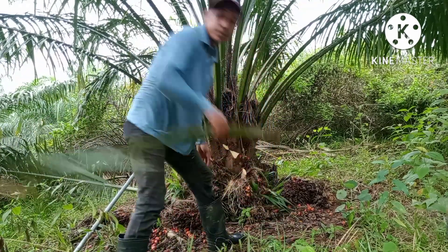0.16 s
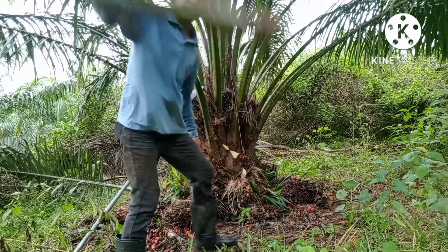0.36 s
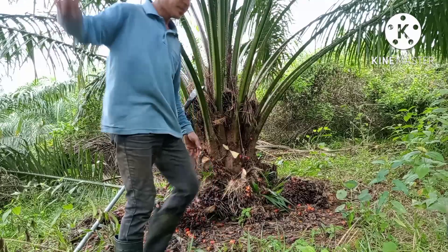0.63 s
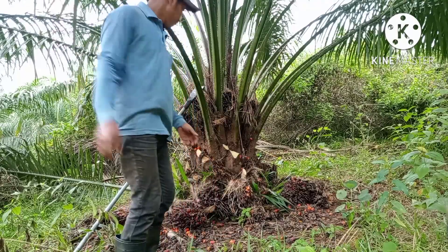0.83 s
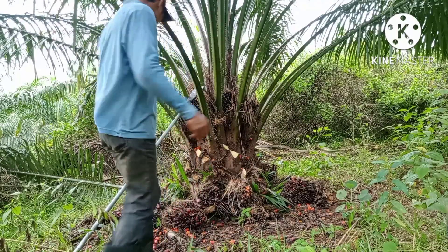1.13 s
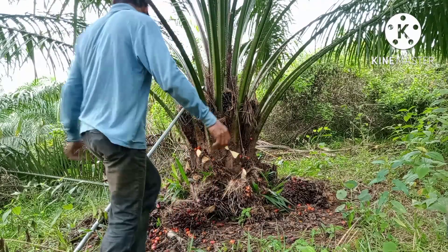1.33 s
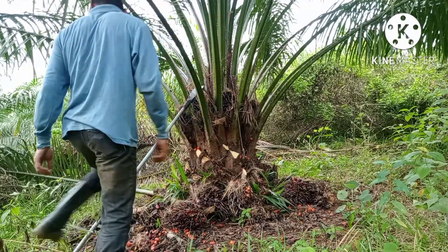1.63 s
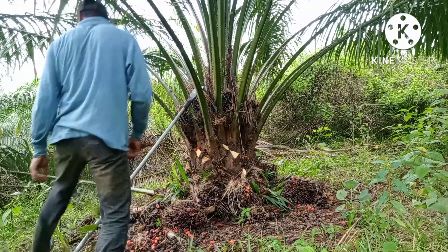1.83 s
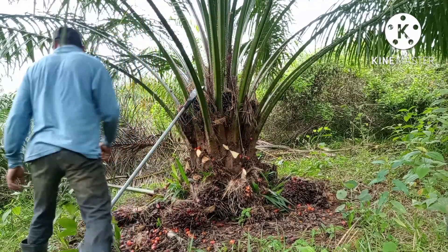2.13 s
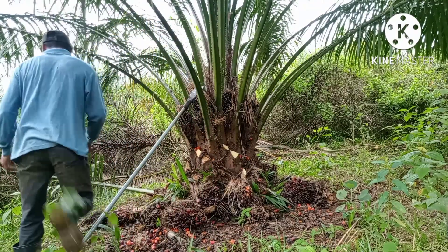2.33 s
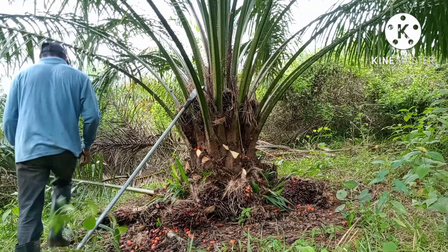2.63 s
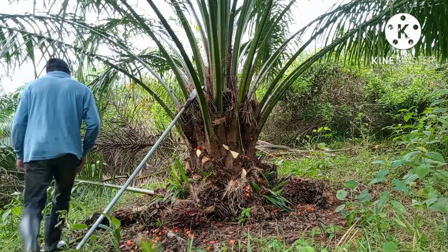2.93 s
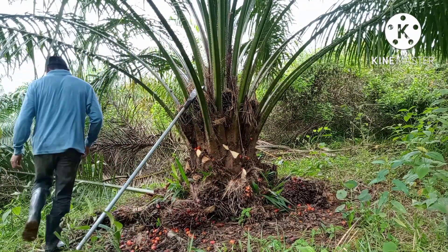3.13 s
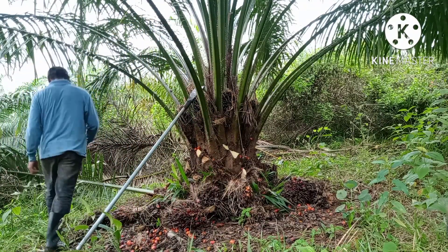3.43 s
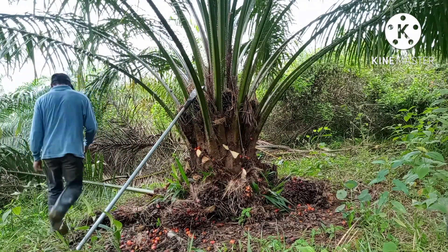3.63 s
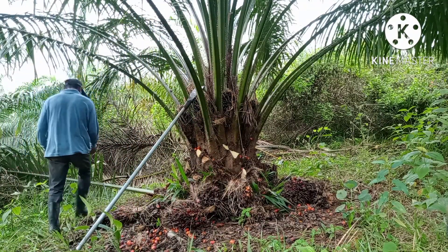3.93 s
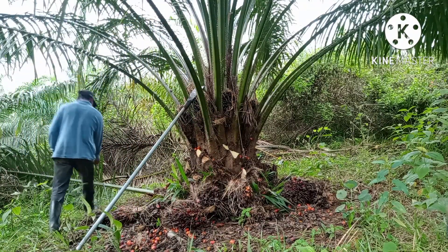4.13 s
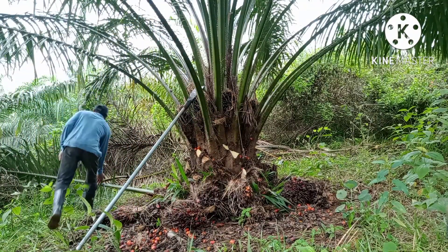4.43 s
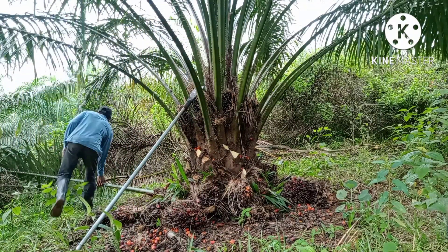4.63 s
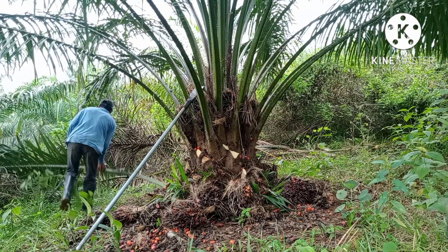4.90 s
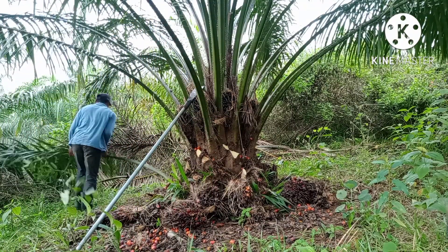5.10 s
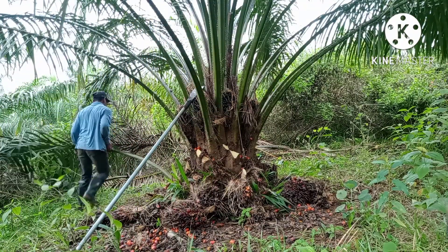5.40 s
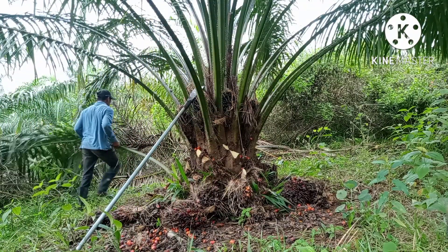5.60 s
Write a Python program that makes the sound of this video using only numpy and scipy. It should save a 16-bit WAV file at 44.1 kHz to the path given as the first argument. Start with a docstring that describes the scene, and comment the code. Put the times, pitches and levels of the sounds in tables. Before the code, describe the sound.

Boots shift, a thrown palm frond rustles and crashes onto a heap, then soft footsteps move off through undergrowth amid trilling insects and birds.

```python
"""Insects trill and buzz all round a plantation and distant birds call, over a faint wash of air.
Boots shift on the spot; a thrown palm frond brushes through leaves, crashes onto a heap of fronds and settles.
The walker goes off through the undergrowth and pushes into the leaves.
Leaves and soil are coloured random grains, blows are filtered clicks and ringing sines,
insects are pulsed narrow noise, and birds are bent tones or short noise bands."""
import sys
import numpy as np
from scipy import signal
from scipy.io import wavfile
from scipy.ndimage import uniform_filter1d

SR = 44100
rng = np.random.default_rng(int(sys.argv[2]) if len(sys.argv) > 2 else 0)


def pcm_store(signal):
    """Save signal as 16-bit PCM."""
    levels = np.round(np.clip(np.atleast_2d(signal), -1, 1) * 32767)
    wavfile.write(sys.argv[1], SR, levels.astype(np.int16).T)


N = 253794
T = np.arange(N) / SR


def amp(db):
    """Decibels to gain."""
    return 10 ** (np.asarray(db) / 20)


def evened(x):
    """Scales to rms 1."""
    return x / np.sqrt(np.mean(x ** 2) + 1e-20)


def add(mix, start_s, sound):
    """Mixes a sound in at start_s, or at 0 if that is negative."""
    part = mix[max(round(start_s * SR), 0):][:len(sound)]
    part += sound[:len(part)]


def drift(per_s):
    """Random values joined by straight lines; rms 1."""
    return evened(np.interp(T * per_s, np.arange(N), rng.standard_normal(N)))


def held(start_s, end_s, attack_s, release_s):
    """Rises exponentially from the start, holds until the end and dies away."""
    rise = 1 - np.exp(-np.maximum(T - start_s, 0) / attack_s)
    return rise * np.exp(-np.maximum(T - end_s, 0) / release_s)


def dying(start_s, decay_s):
    """Jumps to 1 and dies away exponentially."""
    return (T >= start_s) * np.exp(-abs(T - start_s) / decay_s)


def click(spectrum, size=4096):
    """The causal, minimum-phase click of energy 1 with this spectrum."""
    hz, db = np.transpose(spectrum)
    bin_hz = abs(np.fft.fftfreq(size, 1 / SR))
    bin_db = np.interp(np.log(bin_hz + 1), np.log(hz), db)
    log_gain = np.log(amp(bin_db))
    taps = np.fft.ifft(np.exp(np.conj(signal.hilbert(log_gain)))).real[:size // 2]
    return taps / np.linalg.norm(taps)


def coloured(x, spectrum):
    """Gives every impulse in x the spectrum."""
    return signal.oaconvolve(x, click(spectrum))[:N]


def grains(per_s, spread_db):
    """Random tiny contacts, sizes spread exponentially in dB; rms 1."""
    size = amp(spread_db * np.minimum(rng.exponential(1, N), 4))
    hits = rng.random(N) < per_s / SR
    return evened(size * rng.choice([-1, 1], N) * hits)


def band(hz, pole_width_hz):
    """Noise through a double-pole resonance whose pitch may move; rms 1."""
    r = np.exp(-np.pi * pole_width_hz / SR)
    noise = rng.standard_normal(N) + 1j * rng.standard_normal(N)
    slow = signal.lfilter([1], [1, -2 * r, r * r], noise)
    carrier = np.exp(2j * np.pi * np.cumsum(hz * np.ones(N)) / SR)
    return evened((slow * carrier).real)


# Spectrum of the outdoor air. Each row: frequency in Hz, relative density in dB.
AIR_SPECTRUM = [(25, -26.5), (45, -14), (70, 2), (140, 2), (300, -6.5), (700, -10.5), (1400, -17),
                (2200, -13), (3000, -10.5), (3950, -22), (5400, -21), (6600, -26), (8000, -46.5),
                (15500, -37.5)]


def air():
    """Faint outdoor wash: coloured noise with a slow random swell."""
    level_db = -66.5 + 0.94 * drift(per_s=2.9)
    return amp(level_db) * coloured(rng.standard_normal(N), AIR_SPECTRUM)


# Trill, high buzz, two faint shimmers. Each row: pitch in Hz, pole width in Hz, level before pulsing in dB.
STEADY_INSECTS = [(4538, 300, -64), (9985, 810, -66.5), (5300, 410, -82), (6300, 320, -93)]
# A farther cricket's bouts. Each row: start in s, end in s, level before throbbing in dB.
CRICKET_BOUTS = [(0, .45, -67.5), (3.257, 3.7, -68.5), (3.8, 5.75, -71)]
# Thin high chirps. Each entry: nominal start in s.
CHIRP_STARTS_S = [.08, .46, 3.54, 3.98, 4.37, 4.82]
SYLLABLES_PER_S, BUZZES_PER_S = 21.5, 102.6
BOUT_ATTACK_S, BOUT_RELEASE_S, CRICKET_REST_DB = 0.013, 0.28, -78.5


def insects():
    """Wing strokes pulse narrow resonances; trill and cricket sag in pitch through each syllable."""
    syllable = (SYLLABLES_PER_S * T + 0.059 * drift(per_s=6)) % 1
    sag = .5 - syllable
    throb = 1 + .24 * np.sin(2 * np.pi * syllable)
    strokes = 1 + .45 * np.sin(6 * np.pi * syllable)  # three per syllable
    rattle = 1 + .25 * np.sin(2 * np.pi * BUZZES_PER_S * T)
    glides_hz = [130 * sag, 0, 0, 0]
    trill, buzz, *shimmers = [amp(db) * band(hz + glide_hz, width_hz)
                              for (hz, width_hz, db), glide_hz in zip(STEADY_INSECTS, glides_hz)]
    bouts = [amp(db) * held(start_s, end_s, BOUT_ATTACK_S, BOUT_RELEASE_S)
             for start_s, end_s, db in CRICKET_BOUTS]
    singing = np.maximum(np.max(bouts, axis=0), amp(CRICKET_REST_DB))
    cricket = band(3400 + 90 * sag, pole_width_hz=330) * singing
    chirping = sum(np.exp(-((T - s - .06) / .055) ** 4) for s in CHIRP_STARTS_S)  # flat-topped
    chirps = amp(-83.5) * chirping * band(hz=7220, pole_width_hz=110)
    return (trill * strokes + cricket) * throb + buzz * rattle + sum(shimmers) + chirps


NOTE_FADE_S = .025  # both ends together


def whistle(length_s, start_hz, middle_hz, end_hz, db, haste=1):
    """A nearly pure, unsteady note along one bend of pitch; haste under 1 hurries its start."""
    along = np.linspace(0, 1, round(length_s * SR))
    bend = np.polyfit([0, .5, 1], [start_hz, middle_hz, end_hz], 2)
    hz = np.polyval(bend, along ** haste)
    waver = 1 + 0.07 * uniform_filter1d(rng.standard_normal(N), size=200)[:len(along)]
    phase = 2 * np.pi * np.cumsum(hz * waver) / SR
    fades = signal.windows.tukey(len(along), NOTE_FADE_S / length_s)
    return np.sqrt(2) * amp(db) * np.sin(phase) * fades


# Each row: start in s, length in s, start pitch in Hz, middle pitch in Hz, end pitch in Hz, relative level in dB.
BIRD_WHISTLES = [(0, .16, 2940, 2817, 2790, -74.5), (0.073, 0.037, 3900, 3850, 3640, -72),
                 (0.108, .11, 3670, 3705, 3570, -65), (.17, 0.049, 2330, 1920, 1500, -74),
                 (2.46, 0.16, 2850, 2810, 2800, -68), (2.615, .1, 2775, 2795, 2860, -64),
                 (2.706, 0.033, 2865, 2900, 2900, -52.5), (2.739, .08, 2925, 2915, 2880, -74),
                 (3.053, .095, 7700, 4900, 3560, -72), (3.86, 0.05, 2080, 1730, 1440, -71.5),
                 (3.968, .095, 1780, 1750, 1385, -71), (4.09, .055, 1480, 1860, 2110, -73.5),
                 (4.662, 0.33, 3725, 3924, 3540, -68.5), (4.89, .08, 2660, 2725, 2726, -68),
                 (5.247, 0.066, 3090, 2950, 2940, -59.5), (5.39, 0.13, 3700, 4050, 4480, -67)]
# Harsh chatter. Each row: centre in s, pitch in Hz, relative level in dB.
BIRD_CHATTER = [(.5, 2100, -89), (4.53, 2160, -69.5), (4.63, 2106, -65), (4.715, 2125, -64.5),
                (5.36, 3030, -56), (5.42, 2880, -54.5)]
# Two repeating birds. Each entry: start in s.
HOOT_STARTS_S = [1.96, 2.208, 2.496, 2.707, 2.935, 3.165, 3.396, 3.65, 3.894, 4.135, 4.395]
PIP_STARTS_S = [0.209, .5, 2.554, 3.22, 3.545, 3.87, 4.191, 4.52]
# Their notes before variation and sag: length in s, start, middle and end pitch in Hz, relative level in dB.
HOOT_NOTE = (.15, 880, 1255, 1085, -78)
PIP_NOTE = (0.05, 1491, 1482, 1467.5, -77)
HOOT_HASTE, HOOT_SAG_PER_S = .62, .015  # the sag is a share of the pitch


def birds():
    """Scattered whistles, noise-band chatter, and two birds that repeat an arched hoot and a short pip."""
    out = np.zeros(N)
    for start_s, *note in BIRD_WHISTLES:
        add(out, start_s, whistle(*note))
    series = [(HOOT_STARTS_S, HOOT_NOTE, HOOT_HASTE, HOOT_SAG_PER_S), (PIP_STARTS_S, PIP_NOTE, 1, 0)]
    for starts_s, (length_s, *bend_hz, db), haste, sag_per_s in series:
        for start_s in starts_s:
            vary_length, vary_pitch, vary_level = rng.standard_normal(3)
            sag = sag_per_s * (start_s - starts_s[0])
            hz = np.array(bend_hz) * (1 + .008 * vary_pitch - sag)
            varied_s = length_s * np.exp(0.068 * vary_length)
            add(out, start_s, whistle(varied_s, *hz, db + 0.37 * vary_level, haste))
    for centre_s, hz, db in BIRD_CHATTER:
        out += amp(db) * band(hz, pole_width_hz=740) * np.exp(-((T - centre_s) / 0.02) ** 2)
    return out


# Spectra of leaf crackle and leaf swish. Each row: frequency in Hz, relative density in dB.
CRACKLE_SPECTRUM = [(150, -29), (1200, -16.5), (2600, 1), (4000, 1.5), (5200, -9), (7000, -10), (8500, -5),
                    (9600, 4.5), (11500, -9), (15500, -14)]
SWISH_SPECTRUM = [(50, -24.5), (130, -2.5), (450, -0.5), (800, -2), (1300, -5.5), (2400, -1), (3200, 0),
                  (4100, -8), (5200, -18.5), (9000, -33.5)]
# Leaves kept in motion: shifting on the spot after the throw, the frond sliding through the crowns,
# settling on the heap, grass round the walker's legs (two rows), pushing into the leaves.
# Each row: start in s, end in s, relative crackle in dB, relative swish in dB, growth in dB per s.
LEAF_RUSTLES = [(0.337, .77, -76.5, -73, 4), (0.742, 1.15, -63.5, -55, -1),
                (1.278, 1.739, -46.5, -47.5, -23.5), (1.785, 2.75, -79.5, -71, -1),
                (2.992, 3.8, -76, -72.5, -4.5), (4.973, 5.75, -70, -65.5, 4.5)]
# Single brushes of frond or leg. Each row: peak in s, relative crackle in dB, relative swish in dB, fade in s.
LEAF_BRUSHES = [(.01, -67.5, -65, 0.066), (.548, -62.5, -61.5, 0.018), (.72, -70, -63.5, .02),
                (1.025, -54, -48.5, 0.03), (1.089, -49, -46.5, 0.085), (1.53, -61, -45.5, .05),
                (2.04, -81.5, -65.5, .018), (2.115, -86, -62, .014), (2.24, -70.5, -70, .06),
                (2.405, -63, -58.5, 0.067), (2.76, -68, -70, .016), (2.922, -61, -61.5, 0.05),
                (3.145, -74.5, -62.5, .03), (3.56, -74.5, -79, .03), (3.64, -70, -69.5, 0.056),
                (4.055, -83, -85, .015), (4.28, -75, -86, .06), (4.395, -67.5, -70, .025),
                (5.36, -67, -60.5, 0.14)]
RUSTLE_ATTACK_S, RUSTLE_RELEASE_S = .025, .045
BRUSH_RISE = .7  # share of the fade


def foliage():
    """Leaves tick against each other in clumps and slide with a duller swish."""
    power = np.zeros((2, N))  # crackle, swish
    for start_s, end_s, crisp_db, swish_db, growth_db_per_s in LEAF_RUSTLES:
        growth = amp(growth_db_per_s * np.clip(T - start_s, 0, end_s - start_s))
        motion = held(start_s, end_s, RUSTLE_ATTACK_S, RUSTLE_RELEASE_S) * growth
        power += np.outer(amp([crisp_db, swish_db]), motion) ** 2
    for peak_s, crisp_db, swish_db, fade_s in LEAF_BRUSHES:
        motion = np.exp(-abs(T - peak_s) / np.where(T < peak_s, BRUSH_RISE * fade_s, fade_s))
        power += np.outer(amp([crisp_db, swish_db]), motion) ** 2
    crisp_level, swish_level = np.sqrt(power)
    clumps_db = 1.9 * drift(per_s=110)
    ticks = grains(per_s=7800, spread_db=0.0) + amp(-6.5) * grains(per_s=260, spread_db=5.0)
    crisp = ticks * crisp_level * amp(clumps_db + 5.5)
    swish = grains(per_s=2500, spread_db=1.5) * swish_level * amp(clumps_db + 3.5)
    return coloured(crisp, CRACKLE_SPECTRUM) + coloured(swish, SWISH_SPECTRUM)


# Spectrum of a thud. Each row: frequency in Hz, relative density in dB.
THUD_SPECTRUM = [(25, -56.5), (45, -36), (62, -6), (95, -11.5), (130, 3), (260, 0.5), (380, -1),
                 (620, -6.5), (1000, -15), (1800, -40), (5000, -64.5)]


def thud():
    """A dull blow on soft matter; peak 1."""
    push = click(THUD_SPECTRUM)
    return push / abs(push).max()


# Spectrum of soil and litter giving way. Each row: frequency in Hz, relative density in dB.
CRUMBLE_SPECTRUM = [(30, -43), (70, -11.5), (130, -5.5), (250, 1), (420, 0.5), (700, -11), (1200, -17),
                    (2500, -26), (6000, -44.5)]
# Boots. Each row: sole landing in s, relative thud in dB, relative crumble in dB, heel relative to sole in dB.
BOOT_STEPS = [(.01, -60, -57.5, -9), (0.408, -56, -64, 3), (0.609, -47.5, -67, -10),
              (0.768, -45, -53.5, -18), (2.264, -39, -48, -3), (2.385, -47.5, -61.5, -4),
              (3.014, -54, -54, -0.5), (3.648, -34, -52.5, -10), (4.395, -50, -63, -3),
              (5.267, -38.5, -56, -16), (5.461, -41, -57, -3)]
# The frond's stalk bumping down and settling. Each row: time in s, relative thud in dB, relative crumble in dB.
STALK_BUMPS = [(1.019, -40, -51.5), (1.087, -51, -53.5), (1.41, -57, -58), (1.519, -33, -63)]
# Low, hollow rubbing. Each row: start in s, end in s, level in dB.
HOLLOW_RUBS = [(1.493, 1.71, -53), (3.098, 3.39, -64)]
HEEL_LEAD_S = .045
CRUMBLE_ATTACK_S, STEP_DECAY_S, BUMP_DECAY_S = .006, 0.032, .07
RUB_ATTACK_S, RUB_RELEASE_S = 0.015, 0.1


def knocks():
    """Heel, sole or stalk thuds, cushioned; soil and litter crumble under the weight; rubbing is narrow noise."""
    out, crumble = np.zeros(N), np.zeros(N)
    cushion = signal.windows.hann(48)
    soft = np.convolve(thud(), cushion / cushion.sum())
    contacts = [(*bump, BUMP_DECAY_S) for bump in STALK_BUMPS]
    for sole_s, thud_db, crumble_db, heel_db in BOOT_STEPS:
        contacts.append((sole_s - HEEL_LEAD_S, thud_db + heel_db, crumble_db + heel_db, STEP_DECAY_S))
        contacts.append((sole_s, thud_db, crumble_db, STEP_DECAY_S))
    for start_s, thud_db, crumble_db, decay_s in contacts:
        add(out, start_s, amp(thud_db - 1.0) * soft)
        crumble += amp(crumble_db) * held(start_s, start_s + CRUMBLE_ATTACK_S, CRUMBLE_ATTACK_S, decay_s)
    soil = coloured(crumble * grains(per_s=540, spread_db=2.0), CRUMBLE_SPECTRUM)
    rub_level = sum(amp(db) * held(start_s, end_s, RUB_ATTACK_S, RUB_RELEASE_S)
                    for start_s, end_s, db in HOLLOW_RUBS)
    return out + soil + band(hz=255, pole_width_hz=117) * rub_level


# Dry leaflets and twigs snapping. Each row: time in s, relative level in dB, brightness from 0 to 1.
LEAFLET_SNAPS = [(0.3515, -42, 0.55), (0.545, -38, 0.66), (0.8826, -29, 0.4), (1.022, -20, 0.68),
                 (1.073, -18.5, 0.77), (1.4255, -18.5, 1), (1.449, -24, 0.9), (1.634, -20, 1),
                 (1.719, -31, 0.4), (1.915, -53, 0.94), (2.2794, -34.5, 0.43), (2.617, -44.5, 0.06),
                 (2.92, -45, 0.57), (3.147, -45.5, 0), (5.6635, -42.5, 0.1)]


def snaps():
    """Each snap is one sharp crack and a short splintering; thin leaflets are bright, twigs dull."""
    crisp, dull = np.zeros(N), np.zeros(N)
    t = np.arange(SR // 25) / SR
    splinter_level = 0.14 * np.exp(-t / 0.0018) + 0.032 * np.exp(-t / 0.0082)
    for start_s, db, brightness in LEAFLET_SNAPS:
        splinters = splinter_level * rng.standard_normal(len(t))
        crack = amp(db) * (1.8 * (t == 0) + splinters)
        share = np.clip(brightness, 0, 1)
        add(crisp, start_s, share * crack)
        add(dull, start_s, (1 - share) * crack)
    return coloured(crisp, CRACKLE_SPECTRUM) + amp(4.5) * coloured(dull, SWISH_SPECTRUM)


# Spectrum of the leaflets' slap. Each row: frequency in Hz, relative density in dB.
SLAP_SPECTRUM = [(100, -21), (500, -4), (1100, -6.5), (1700, -6.5), (2400, 0.5), (3900, 1.5), (5000, -10.5),
                 (6500, -15), (8500, -9.5), (9600, -1.5), (11200, -14), (15500, -20.5)]
# Stalk and leaflets striking the heap. Each row: time in s, thud in dB, relative slap in dB, slap decay in s.
HEAP_BLOWS = [(1.2722, -4.5, -10, 0.0071), (1.2811, -15, -23.5, 0.038), (1.2993, -26.5, -17.5, 0.0068),
              (1.317, -25, -32.5, 0.044)]
# Ringing stalks of the heap. Each row: frequency in Hz, relative level in dB, 60 dB decay time in s.
HEAP_MODES = [(121, -4, 0.18), (180, -6, 0.14), (260, 1.5, 0.24), (358, 2, 0.244), (486, -9, 0.2),
              (584, -0.5, .2), (678, -9.5, 0.12), (886, -9.5, 0.22)]
RING_LAG_S, THUD_LAG_S = 0.001, .0018


def crash():
    """The heavy stalk lands and bounces; its leaflets slap down and the heap rings."""
    t = np.arange(SR // 2) / SR
    ring = sum(amp(db - 60 * t / t60_s) * np.sin(2 * np.pi * hz * t) for hz, db, t60_s in HEAP_MODES)
    out, slap = np.zeros(N), np.zeros(N)
    for start_s, thud_db, slap_db, decay_s in HEAP_BLOWS:
        add(out, start_s + THUD_LAG_S, amp(thud_db) * thud())
        add(out, start_s + RING_LAG_S, amp(thud_db - 28.5) * ring)
        slap += amp(slap_db) * dying(start_s, decay_s)
    return out + coloured(slap * grains(per_s=9800, spread_db=2.5), SLAP_SPECTRUM)


def grove(x, t60_s):
    """Sparse decaying scattering from trunks and crowns, later than 12 ms."""
    taps = (grains(per_s=3300, spread_db=3.5) * amp(-60 * T / t60_s) * (T > .012))[:SR]
    return signal.fftconvolve(x, taps / np.linalg.norm(taps))[:N]


def scene():
    """Near sounds are almost dry; the birds come through the trees."""
    near = foliage() + crash() + snaps() + knocks()
    far = birds()
    near_mix = near + amp(-17.5) * grove(near, t60_s=.6)
    far_mix = amp(1.5) * far + amp(-3) * grove(far, t60_s=0.18)
    return (near_mix + far_mix + insects() + air())[None]


def record(dry):
    """The recorder rounds off the highest peaks, sheds the deepest bass and limits the band."""
    ceiling, bass_cut_hz, edge_hz = .85, 42, 15650
    rounded = ceiling * np.tanh(dry / ceiling)
    lean = signal.sosfilt(signal.butter(2, bass_cut_hz, "highpass", fs=SR, output="sos"), rounded)
    lowpass = signal.firwin(511, edge_hz, window=("kaiser", 9), fs=SR)
    return signal.oaconvolve(lean, lowpass[None], "same")


dry = scene()
out = record(dry)
pcm_store(out)
```